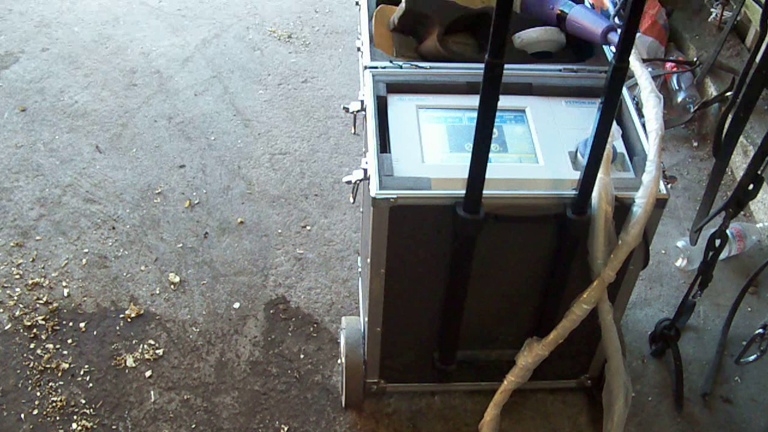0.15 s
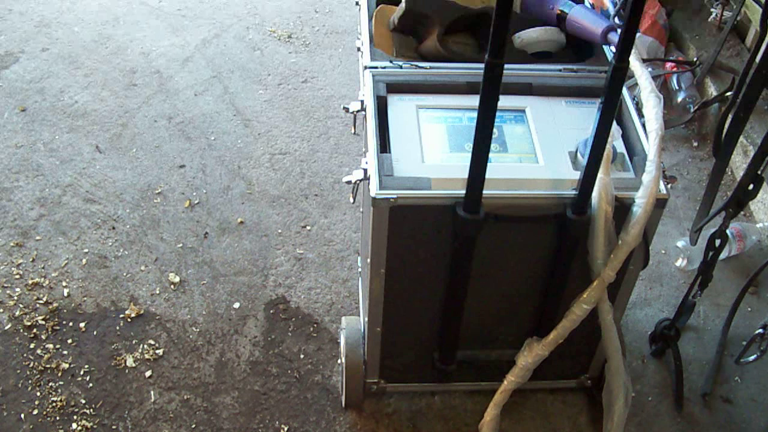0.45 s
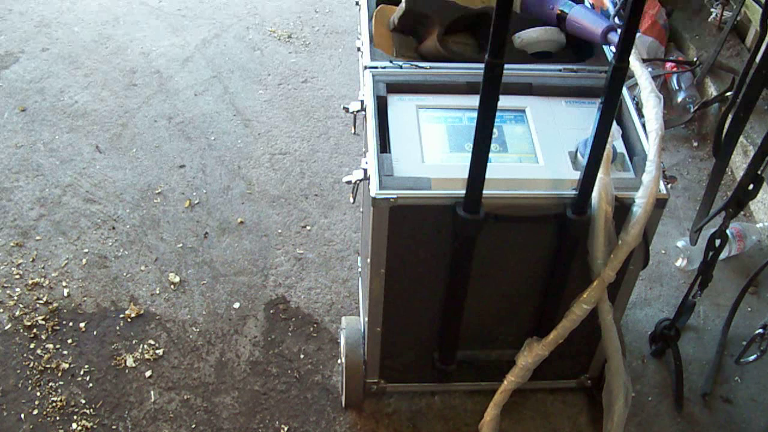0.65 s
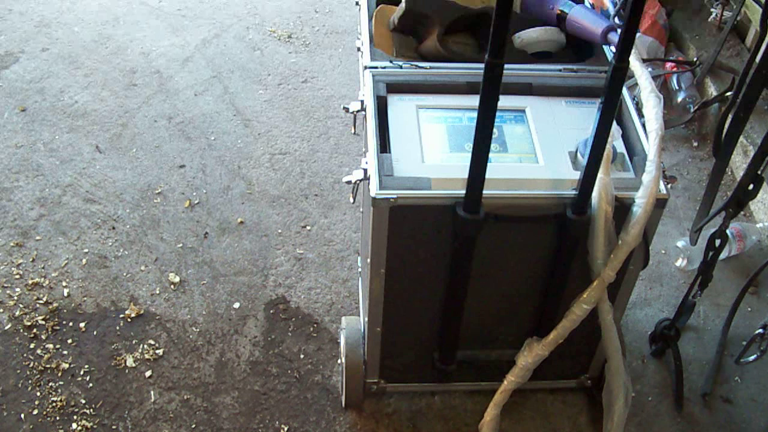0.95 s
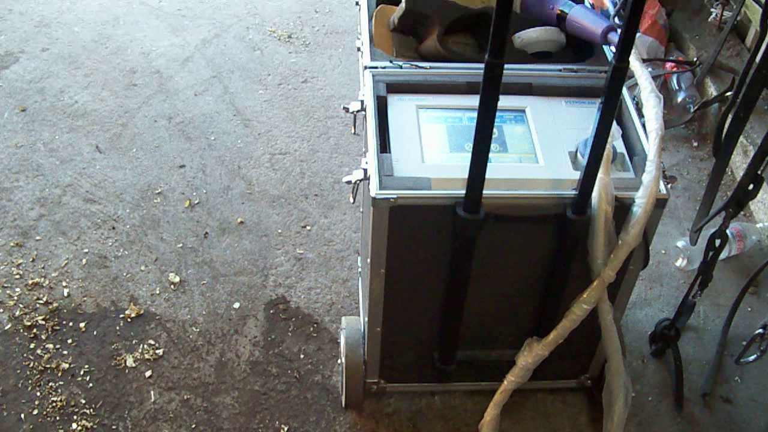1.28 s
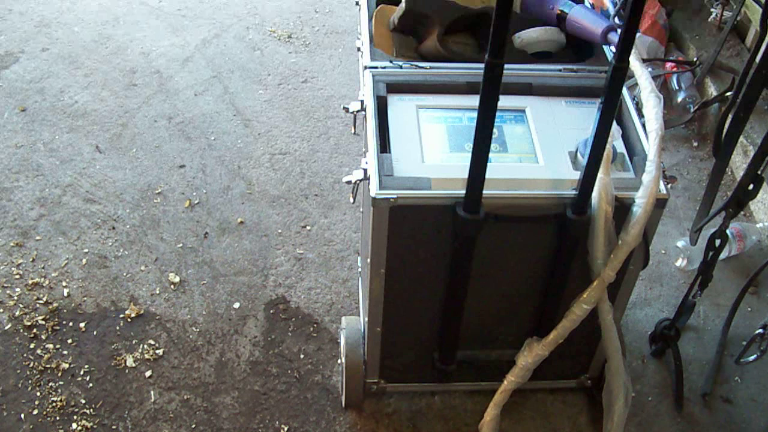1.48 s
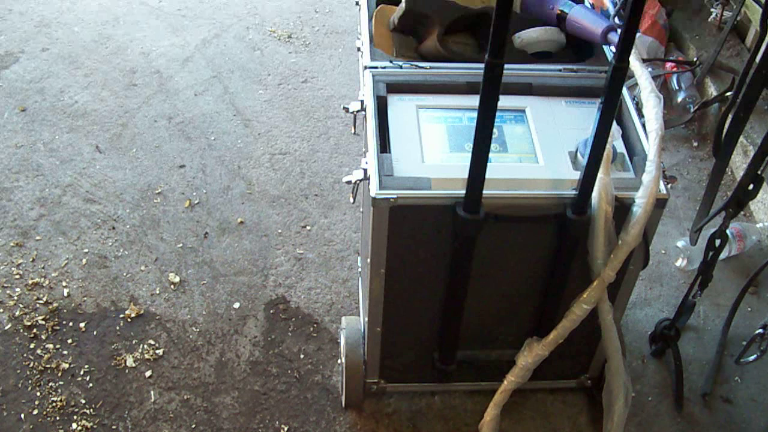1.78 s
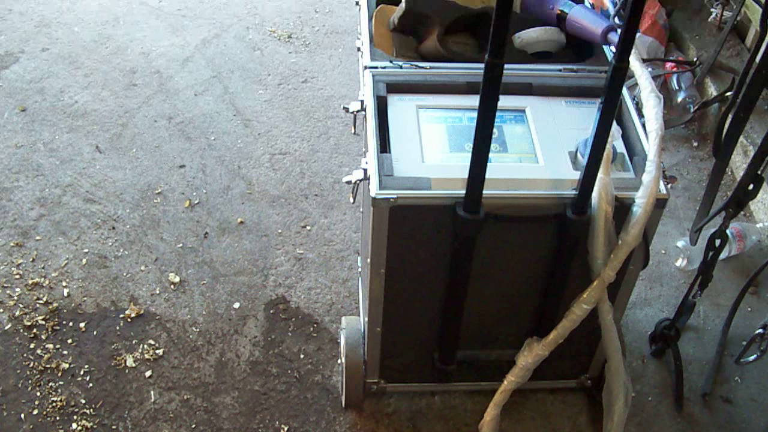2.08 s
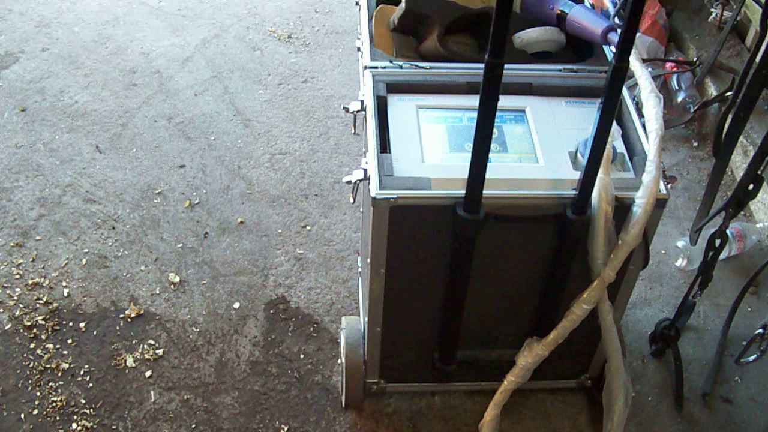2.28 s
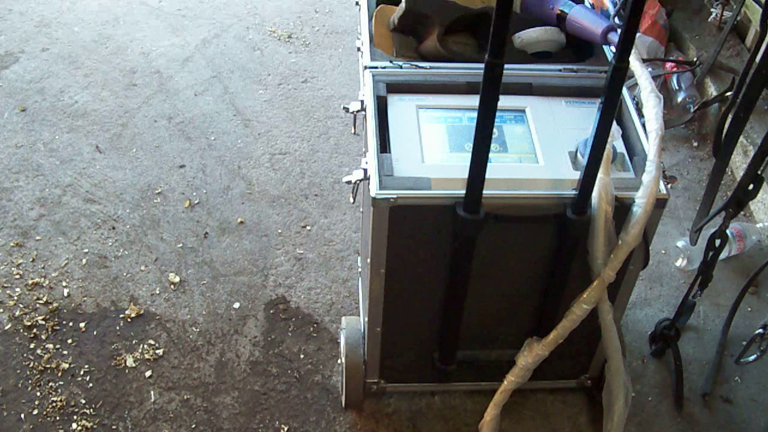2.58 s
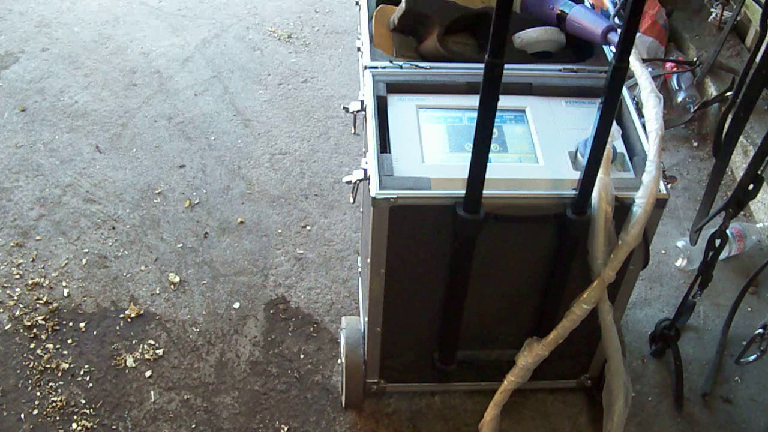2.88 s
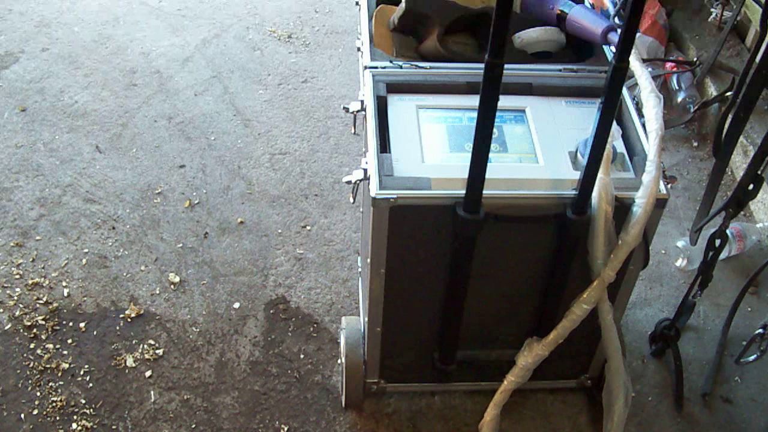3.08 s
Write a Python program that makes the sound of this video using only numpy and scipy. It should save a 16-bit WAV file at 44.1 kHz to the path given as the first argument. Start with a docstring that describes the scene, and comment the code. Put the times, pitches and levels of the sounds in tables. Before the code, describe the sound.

Sharp, loud clicks from a pneumatic therapy handpiece repeat evenly, four per second, in a barn.

```python
"""Over a quiet background, sharp shots begin almost at once and repeat four times a second in a barn.
They come from a pneumatic shockwave handpiece close to a microphone: each is a burst of crack noise plus damped
sine modes, and overloads the microphone. The barn answers with decaying coloured noise and a narrow lingering ring;
the returning projectile ticks faintly, as decaying noise. Handling gives two faint knocks, and one puff of air,
low noise with a drawn level, buffets the microphone."""
import sys
import numpy as np
from scipy import signal
from scipy.fft import rfft, irfft
from scipy.io import wavfile
from scipy.ndimage import uniform_filter1d

SR = 44100
rng = np.random.default_rng(int(sys.argv[2]) if len(sys.argv) > 2 else 0)


def to_wav(s):
    """Save 16-bit WAV."""
    ch = np.atleast_2d(s).T  # columns
    pcm = np.round(np.clip(ch, -1, 1) * 32767)  # PCM
    wavfile.write(sys.argv[1], SR, pcm.astype(np.int16))


N = 143325
t = np.arange(N) / SR
FREQS = np.fft.rfftfreq(N, 1 / SR)
ECHO_SIZE = 24000  # samples of reverberation computed per shot

# blows of the projectile: t/s, strength level/dB, main ring f/Hz, main ring level/dB, crack level/dB,
# hollow knock level/dB, bright ring f/Hz, bright ring level/dB
SHOTS = [(.1025, 0.5, 1504, -6.5, -3.5, -7.5, 5040, -6), (0.3532, -3.5, 1553, -4.5, 1.5, -3.5, 4730, -0.5),
         (0.6039, -2, 1700, -9.5, 0, -6.5, 5870, -0.5), (0.8544, -5, 1694, 0.5, -4, -1.5, 5470, -2.5),
         (1.1054, -7, 1736, 4.5, 3.5, 3, 5780, -2), (1.3562, 2, 1420, -1, -1.5, -4, 5640, -6),
         (1.6065, -4.5, 1667, 1.5, 2.5, 4, 5900, 1), (1.8574, -1, 1490, -3, 0, -0.5, 5320, 3),
         (2.1084, -5, 1570, -1, 1, 3, 5680, 1.5), (2.3588, -3.5, 1570, -2.5, -0.5, 0, 5580, -3),
         (2.6097, -0.5, 1418, 0, -4, -2, 5010, -6.5), (2.861, -6.5, 1728, 0.5, 4, 2, 5200, -9),
         (3.1112, -4, 1546, 2.5, 3, 0.5, 6170, -10.5)]
# spectrum of the contact crack: f/Hz, relative level per hertz/dB
CRACK_COLOUR = [(150, -35.5), (400, -20), (1200, -0.5), (2500, 1.5), (4000, 1.5), (5500, 2), (7200, 5),
                (8500, -17)]
# spectrum of the barn's reverberation: f/Hz, relative level per hertz/dB
BARN_COLOUR = [(70, -28), (150, -15.5), (330, -3.5), (470, -2.5), (580, -13.5), (720, -4.5), (930, -1.5),
               (1150, -15), (1450, -1), (1730, -0.5), (1980, -8), (2280, -7), (2750, -16), (4300, -10.5),
               (6000, -11.5), (7400, -16.5), (8000, -21.5), (8700, -41.5)]


def undb(db):
    """A level in decibels is twenty times the logarithm of the amplitude ratio; return that ratio."""
    return 10 ** (np.asarray(db) / 20)


def at(table, hz):
    """Pitch is logarithmic in frequency, so a table is interpolated on a log-frequency axis."""
    f, v = np.array(table, float).T
    return np.interp(np.log(np.maximum(hz, 1)), np.log(f), v)


def fade(age, t60):
    """Linear damping: exponential decay from age zero, falling 60 dB in t60 seconds."""
    return (age >= 0) * np.exp(-np.log(1000) * np.maximum(age, 0) / t60)


def add(out, start, x):
    """Superposition: mix a sound in at a time in seconds."""
    i = int(start * SR)
    out[:, i:i + x.shape[-1]] += x[..., :max(N - i, 0)]


def lean(x, balance):
    """Stereo localisation: level differences by frequency, and a small left lead below the treble."""
    left_lead_s = .00004
    db = at(balance, FREQS)
    lead = np.exp(1j * np.pi * FREQS * left_lead_s / (1 + (FREQS / 4000) ** 4))
    gains = undb(np.array([db, -db]) / 2)
    return irfft(rfft(x) * gains * np.array([lead, 1 / lead]), N)


def noise(colour, size):
    """Diffuse sound: coloured stereo noise of rms 1 whose channels are most alike at low frequencies."""
    # correlation of the two channels: f/Hz, likeness/0-1
    likeness = [(100, 0.78), (500, 0.8), (1000, 0.6), (2000, 0.13), (4000, 0.08)]
    hz = np.fft.rfftfreq(size, 1 / SR)
    mid, side = rfft(rng.standard_normal((2, size)))
    like = at(likeness, hz)
    mid = mid * np.sqrt((1 + like) / 2)
    side = side * np.sqrt((1 - like) / 2)
    gain = undb(at(colour, hz))
    gain = gain / np.sqrt(np.mean(gain ** 2))
    return irfft(np.array([mid + side, mid - side]) * gain, size)


def air():
    """Random pressure: steady background noise, soft low bumps and one low puff on the microphone."""
    floor_db = -54
    # background spectrum: f/Hz, relative level per hertz/dB
    floor_colour = [(20, 4), (60, 1), (110, -0.5), (200, -5), (400, -3), (800, -7), (1200, -17.5),
                    (1600, -10), (2600, -22), (4000, -22), (7000, -26.5), (8500, -33.5)]
    # course of the puff: t/s, level/dB
    puff_level = [(1.64, -79.5), (1.67, -41), (1.705, -26), (1.75, -21), (1.79, -31.5), (1.85, -38),
                  (1.94, -44), (2.03, -46), (2.15, -59)]
    # puff spectrum: f/Hz, relative level per hertz/dB
    puff_colour = [(15, -1), (30, -2), (70, -1), (110, -2.5), (160, -31.5), (280, -26), (500, -57.5),
                   (1500, -74.5)]
    # soft low bumps: t/s, level/dB, half-length/s
    bump_table = [(0.504, -56, 0.12), (1.063, -49, .025), (1.289, -47.5, 0.063)]
    # bump spectrum: f/Hz, relative level per hertz/dB
    rumble_colour = [(20, -2), (60, -15), (115, 3.5), (170, -14.5), (300, -35), (1000, -62.5)]

    puff = undb(np.interp(t, *np.array(puff_level).T)) * noise(puff_colour, size=N)
    swells = sum(undb(db) * np.exp(-((t - when) / half) ** 2) for when, db, half in bump_table)
    bumps = swells * noise(rumble_colour, size=N)
    return puff + bumps + undb(floor_db) * noise(floor_colour, size=N)


def ticks():
    """Impact noise: each projectile return and two handling knocks excite decaying coloured bursts."""
    return_delay_s, return_db, return_t60_s = 0.1, -57, 0.08
    rattle_t60_s = 0.17
    # handling knocks: t/s, level/dB
    rattle_table = [(1.056, -44), (3.028, -52)]
    # handling knock spectrum: f/Hz, relative level per hertz/dB
    rattle_colour = [(100, 17), (700, 4), (1100, -4), (1700, 12), (2600, -20.5), (6000, -27), (8500, -29)]

    returns = sum(undb(return_db) * fade(t - start - return_delay_s, return_t60_s) for start, *_ in SHOTS)
    rattles = sum(undb(db) * fade(t - start, rattle_t60_s) for start, db in rattle_table)
    return returns * noise(CRACK_COLOUR, size=N) + rattles * noise(rattle_colour, size=N)


def lingering():
    """Narrow-band reverberation: a ring a little above each shot's main ring hangs in the barn."""
    level_db, rise_hz, width_hz, t60_s = -28.5, 80, 150, .32
    out, age = np.zeros((2, N)), t[:ECHO_SIZE]
    hz = np.fft.rfftfreq(ECHO_SIZE, 1 / SR)
    for start, db, ring_hz, *_ in SHOTS:
        band = 1 / (1 + ((hz - ring_hz - rise_hz) / width_hz) ** 2)
        ring = irfft(rfft(noise(BARN_COLOUR, size=ECHO_SIZE)) * band, ECHO_SIZE)
        add(out, start, undb(level_db + db) * ring / np.std(ring) * fade(age, t60_s))
    return out


def imprint(blow, size):
    """Source-filter principle: the treble peaks and gaps of a shot partly colour its echoes."""
    depth = 0.38  # 0 leaves no mark, 1 the full mark
    above_hz, smoothing_hz = 2300, 1300
    power = np.abs(rfft(blow.mean(axis=0), size)) ** (2 * depth)
    ripple = np.sqrt(power / uniform_filter1d(power, int(smoothing_hz * size / SR)))
    return np.where(np.fft.rfftfreq(size, 1 / SR) > above_hz, ripple, 1)


def clusters(size):
    """Uneven reflection density: smoothed random gain of rms 1 bunches the reflections in time."""
    spread_db, span = 1.6, int(.002 * SR)  # span in samples
    wander = np.sqrt(span) * uniform_filter1d(rng.standard_normal(size), span)
    gain = undb(spread_db * wander)
    return gain / np.sqrt(np.mean(gain ** 2))


def barn(blows):
    """Reverberation: dense echoes, partly alike for every shot, decay faster at high frequencies."""
    level_db, build_s = -21, 0.001
    same = 0.78  # share of echo power whose pattern repeats from shot to shot
    wall_s, wall_db, wall_t60_s = .052, -7.5, 0.38  # far wall, relative to the decay in each band
    # reverberation time: f/Hz, t60/s
    t60_table = [(150, 0.28), (500, 0.24), (1000, 0.26), (1700, 0.24), (3000, 0.22), (5000, 0.21),
                 (8000, 0.2)]

    out, age = np.zeros((2, N)), t[:ECHO_SIZE]
    hz = np.fft.rfftfreq(ECHO_SIZE, 1 / SR)
    # overlapping bands that sum to one, each with its own decay
    bands = [at([(f, f == centre) for f, _ in t60_table], hz) for centre, _ in t60_table]
    build = 1 - np.exp(-age / build_s)
    second_wave = 1 + undb(wall_db) * fade(age - wall_s, wall_t60_s)
    swell = build * second_wave * clusters(size=ECHO_SIZE)
    decays = [fade(age, t60) * swell for _, t60 in t60_table]

    pattern = noise(BARN_COLOUR, size=ECHO_SIZE)
    for (start, *_), blow in zip(SHOTS, blows):
        fresh = noise(BARN_COLOUR, size=ECHO_SIZE)
        echoes = rfft(np.sqrt(same) * pattern + np.sqrt(1 - same) * fresh)
        echoes = echoes * imprint(blow, size=ECHO_SIZE)
        for band, decay in zip(bands, decays):
            add(out, start, irfft(echoes * band, ECHO_SIZE) * decay)
    return undb(level_db) * out


def damped_mode(age, hz, db, t60):
    """Modal vibration: a struck resonance is an exponentially decaying sine."""
    return undb(db) * np.sin(2 * np.pi * hz * age) * fade(age, t60)


def shot(db, ring_hz, ring_db, crack_db, knock_db, bright_hz, bright_db):
    """Impact excitation: one blow gives a short contact crack and heavily damped modes."""
    mode_scatter = 0.005  # relative standard deviation of the mode frequencies
    crack_hold_s, crack_t60_s = 0.0026, 0.0078
    # nominal modes of the handpiece and the body it rests on: f/Hz, level/dB, t60/s
    mode_table = [(234, -26, 0.0072), (400, -10, .014), (1490, -17, 0.054), (1760, -19, 0.033),
                  (2207, -18.5, 0.045), (3095, -14, .014), (4750, -12, 0.0061), (6505, -18.5, 0.021),
                  (7174, -16, 0.007)]

    age = t[:2048]
    detune = 1 + mode_scatter * rng.standard_normal(len(mode_table))
    body = sum(damped_mode(age, hz * k, d, t60) for (hz, d, t60), k in zip(mode_table, detune))
    main_ring = damped_mode(age, ring_hz, -0.5 + ring_db, t60=0.018)
    bright_ring = damped_mode(age, bright_hz, -6 + bright_db, t60=.018)
    knock = damped_mode(age, 732, -6 + knock_db, t60=0.02)
    crack_envelope = fade(np.maximum(age - crack_hold_s, 0), crack_t60_s)
    crack = undb(-8 + crack_db) * noise(CRACK_COLOUR, size=len(age)) * crack_envelope
    return undb(db) * (body + main_ring + bright_ring + knock + crack)


def handpiece(blows):
    """Direct radiation: a small body radiates deep bass poorly, so the shots are high-passed."""
    low_cut_hz = 186
    # left minus right: f/Hz, level/dB
    direct_balance = [(100, 6), (400, 5.5), (750, 8.5), (1500, 5.5), (2500, 1), (5000, -3), (7500, -6.5)]
    out = np.zeros((2, N))
    for (start, *_), blow in zip(SHOTS, blows):
        add(out, start, blow)
    high_pass = signal.butter(3, low_cut_hz, "high", fs=SR, output="sos")
    return lean(signal.sosfilt(high_pass, out), direct_balance)


def scene():
    """Superposition of the close handpiece's direct sound and the barn around it."""
    # left minus right: f/Hz, level/dB
    room_balance = [(100, 6.5), (550, 7), (950, 5), (1600, 2.5), (2700, 1), (4700, -6), (8000, -9)]
    blows = [shot(*row[1:]) for row in SHOTS]
    surroundings = barn(blows) + lingering() + ticks() + air()
    return handpiece(blows) + lean(surroundings, room_balance)


def record(dry):
    """Saturation and band-limiting: the overloaded microphone flattens peaks, then the treble is cut."""
    overload = 0.95  # amplitude that the output approaches but never passes
    rolloff_hz, top_hz = 7800, 8834
    flat = dry / (1 + (dry / overload) ** 4) ** (1 / 4)
    soft = signal.sosfilt(signal.butter(6, rolloff_hz, fs=SR, output="sos"), flat)
    # steep upper limit: 0.2 dB ripple below it, 70 dB rejection beyond
    return signal.sosfilt(signal.ellip(8, .2, 70, top_hz, fs=SR, output="sos"), soft)


dry = scene()
out = record(dry)
to_wav(out)
```